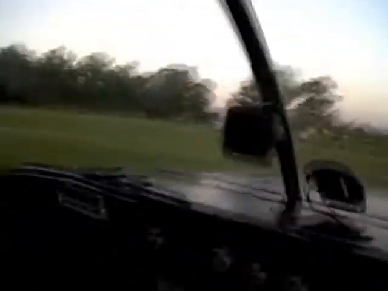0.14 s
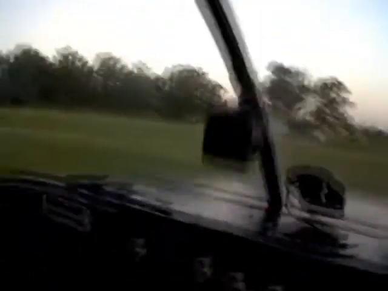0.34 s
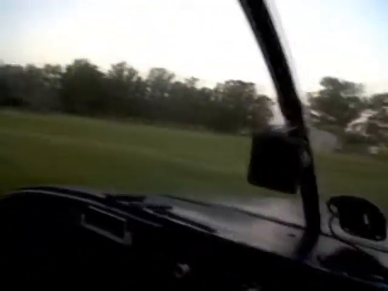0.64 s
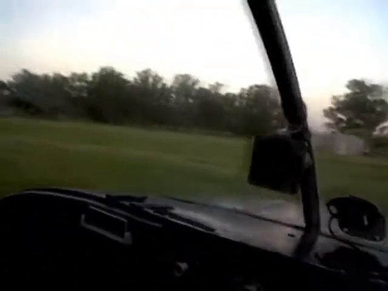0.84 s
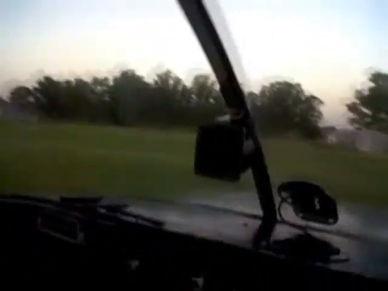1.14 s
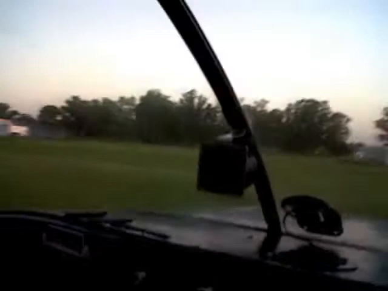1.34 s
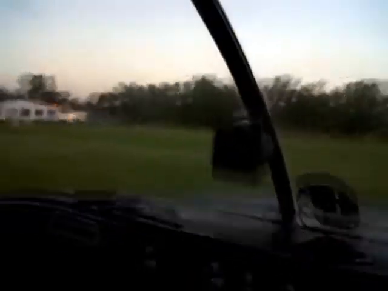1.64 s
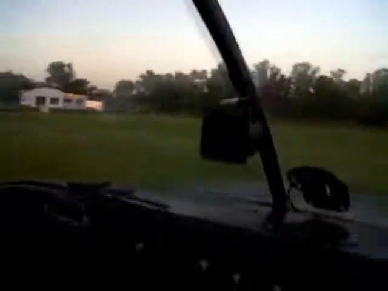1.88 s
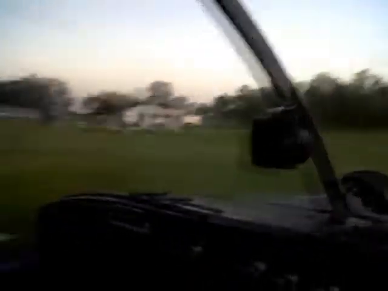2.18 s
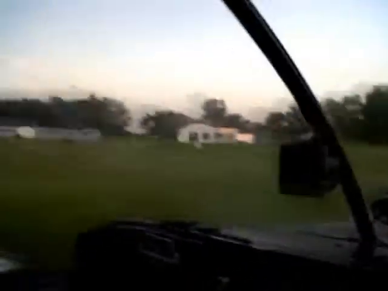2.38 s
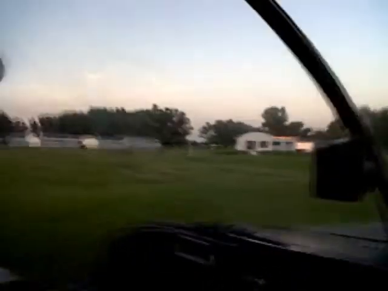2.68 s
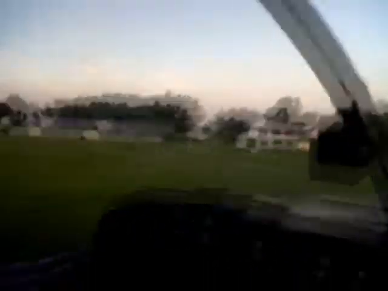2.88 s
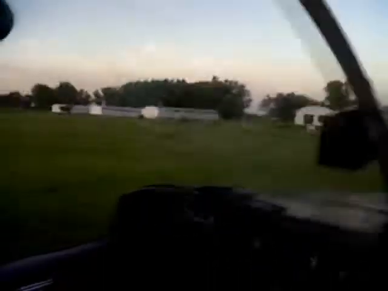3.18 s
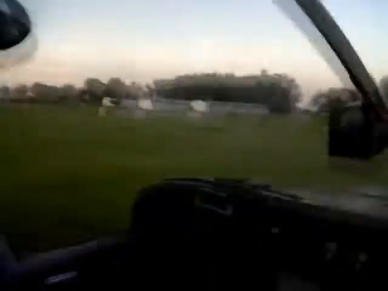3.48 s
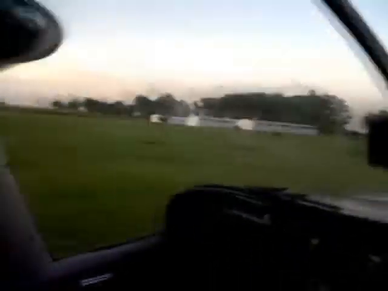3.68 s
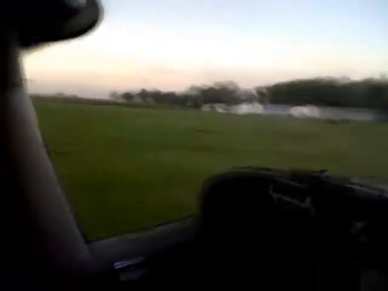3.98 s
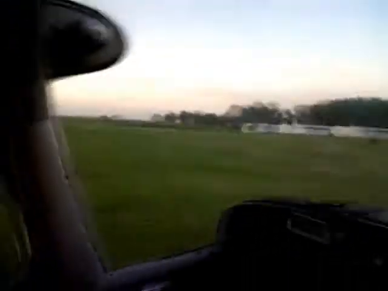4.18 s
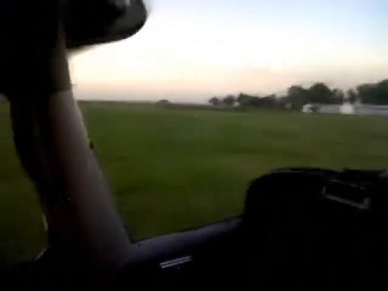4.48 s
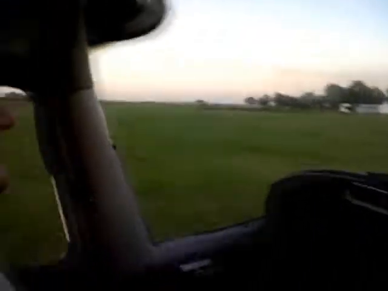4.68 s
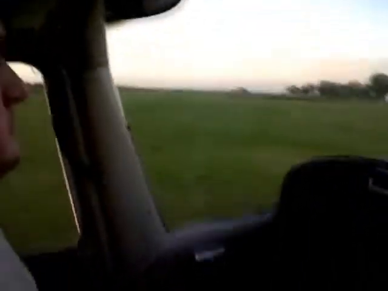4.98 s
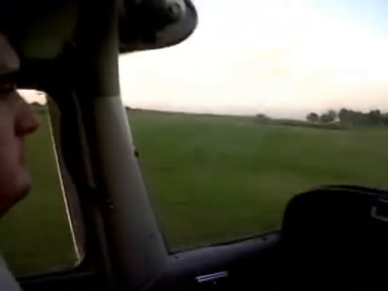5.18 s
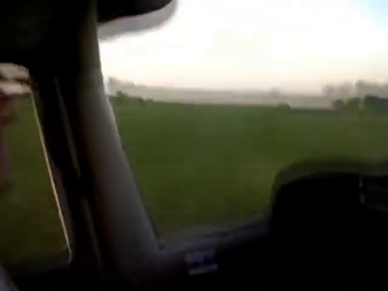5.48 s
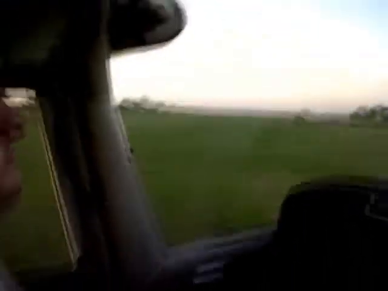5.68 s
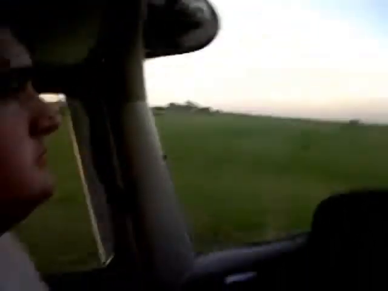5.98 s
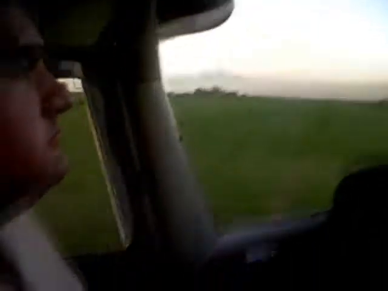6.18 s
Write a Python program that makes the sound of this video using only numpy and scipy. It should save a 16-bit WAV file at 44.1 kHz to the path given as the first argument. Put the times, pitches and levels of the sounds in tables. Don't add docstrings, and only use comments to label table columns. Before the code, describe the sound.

Muffled engine hum in a bumpy cabin, quiet at first, then dull jolts, hard plastic knocks, brief squeaks and metallic jingles in clusters.

```python
import sys
import numpy as np
from scipy import signal
from scipy.fft import rfft, irfft, next_fast_len
from scipy.io import wavfile
from scipy.ndimage import uniform_filter1d

SR = 44100
rng = np.random.default_rng(int(sys.argv[2]) if len(sys.argv) > 2 else 0)


def waveform_to_disk(signal):
    frames = np.transpose(np.atleast_2d(signal))
    scaled = np.clip(frames, -1, 1) * 32767
    samples = np.round(scaled).astype(np.int16)
    wavfile.write(sys.argv[1], SR, samples)


def undo_db(level):
    steps = np.asarray(level, float) / 20
    return 10 ** steps


N = 279153

# (time [s], rate [firings/s])
FIRING_RATE = [
    (0, 26.5),
    (.45, 28.0),
    (.85, 28.3),
    (1.15, 27.6),
    (1.5, 26.5),
    (1.9, 25.75),
    (2.3, 25.4),
    (2.75, 25.03),
    (6.33, 24.98),
]
# (multiple of firing rate [-], level [dB])
ENGINE_ORDERS = [(2, -21), (3, -13), (4, -1), (5, -13), (6, -4.5), (7, -12.5), (8, -7), (9, -10),
                 (10, -13.5)]
ORDER_LOAD_SHARE = {2: .2, 3: 1, 4: -.15}
# (frequency [Hz], density [dB/Hz])
RUMBLE_SPECTRUM = [(12, -54), (20, -27), (48, -22.5), (71, -17), (92, 0), (214, 4.5), (326, -15.5),
                   (420, -9.5), (550, -51), (920, -120)]
# (frequency [Hz], density [dB/Hz])
CABIN_SPECTRUM = [(150, -40.5), (250, -4), (329, -2.5), (721, -8), (810, 4.5), (980, -8.5), (1220, -0.5),
                  (2100, -20.5), (2730, -47), (4620, -120)]
# (frequency [Hz], density [dB/Hz])
RATTLE_SPECTRUM = [(1500, -23), (1900, 0), (2300, -7.5), (2800, -12.5), (3250, -15.5), (3550, -23),
                   (3850, -26), (4100, -28.5)]
# (frequency [Hz], width [Hz], level [dB])
PANEL_MODES = [(548, 80, -2.5), (685, 22, -4.5), (808.3, 28, 1), (891, 54, -0.5), (1037, 9.2, -7.5),
               (1197, 32, -2), (1226, 76, 0), (1334.5, 13, -6), (1455, 82, 1.5), (1584.6, 12, -4.5),
               (1774, 94, -4)]
# (time [s], peak [dB])
TICK_HITS = [(0.0707, -61), (0.377, -48), (1.0839, -62), (1.3448, -46), (1.6307, -59), (1.8063, -58),
             (1.8307, -56), (2.2228, -55), (2.3501, -52), (2.5132, -45), (2.7053, -42), (2.7921, -47),
             (2.8414, -47.5), (3.5818, -47), (3.6651, -45), (4.4094, -54), (4.4393, -41), (4.6154, -51),
             (4.6778, -54), (5.5897, -37), (5.676, -44), (6.1988, -55)]
TRIM_NOTES_HZ = (798, 890, 1227, 1427)
# (time [s], peak [dB], chatter T60 [s])
DOOR_TRIM_HITS = [(1.546, -16.5, .14), (1.668, -15.5, 0.099), (1.844, -15, 0.031), (2.455, -15.5, 0.13),
                  (2.8, -11.5, .08), (3.501, -19, 0.049), (3.667, -8.5, 0.11), (3.903, -4, .04),
                  (4.57, -18, .06), (4.678, -16.5, .1), (4.698, -8, .08), (4.853, -8.5, 0.09),
                  (5.567, -21, .08), (5.662, -11.5, 0.09), (5.847, -18, .09)]
# (time [s], peak [dB], chatter T60 [s])
LOW_TRIM_HITS = [
    (2.148, -21, .09),
    (2.379, -6, 0.06),
    (2.903, -17, 0.074),
    (4.025, -24, .1),
    (4.106, -6, 0.12),
    (4.213, -11.5, 0.092),
    (4.374, -23, .06),
    (5.814, -25, .08),
]
# (time [s], peak [dB], chatter T60 [s])
MID_TRIM_HITS = [(.12, -16.5, 0.038), (.219, -23, 0.073), (.292, -19, .09), (.437, -23, 0.043),
                 (1.496, -19.5, 0.17), (2.222, 0, 0.047), (2.298, -10, .06), (2.353, -7, 0.11),
                 (2.705, -5, .12), (2.715, -8, 0.093), (2.761, -15, .08), (2.856, -5, 0.071),
                 (3.286, -25, .08), (3.409, -17.5, 0.13), (3.97, -8, 0.086), (4.052, -8, 0.1),
                 (4.263, -4, 0.16), (4.292, -2, 0.058), (4.425, -10, 0.22), (6.039, -19, 0.047)]
# (time [s], peak [dB], chatter T60 [s])
HIGH_TRIM_HITS = [(1.748, -18.5, 0.12), (1.825, -15.5, 0.075), (1.982, -21, .09), (3.706, -14.5, 0.18),
                  (3.897, -7, 0.046), (4.159, -8.5, .08), (4.479, -8, 0.11), (4.619, -6.5, 0.16),
                  (4.756, -10, 0.15), (4.952, -10.5, .07), (5.091, -19, 0.14), (5.592, -6.5, 0.076),
                  (5.716, -11.5, 0.054), (5.735, -14, .07), (5.75, -13.5, 0.1), (6.259, -19, 0.062)]
# (time [s], peak [dB], frequency [Hz], length [s])
SQUEAK_HITS = [(0.244, -40, 2530, 0.021), (0.463, -46, 2600, 0.019), (1.587, -26.5, 2520, 0.013),
               (1.612, -40, 2600, 0.0067), (2.241, -32, 2650, 0.011), (2.713, -27.5, 2545, .022),
               (2.784, -22.5, 2524, 0.016), (2.837, -18, 2533, 0.012), (3.117, -44, 2570, 0.013),
               (3.19, -43.5, 2550, 0.02), (5.872, -40, 2780, 0.019), (5.978, -46.5, 2690, 0.015)]
# (time [s], peak [dB], frequency [Hz])
FIRING_THUMPS = [(.725, -25, 424), (.876, -18.5, 500), (1.082, -21.5, 527), (1.35, -21.5, 404), (1.425, -22.5, 423),
                 (1.807, -24, 400), (1.841, -21, 560), (2.22, -13.5, 566), (2.506, -18, 614), (2.745, -18, 462),
                 (2.861, -9, 523), (2.904, -10.5, 520), (2.945, -16, 607), (3.026, -17, 553), (3.069, -15.5, 526),
                 (3.147, -22, 480), (3.501, -20, 423), (3.665, -9.5, 590), (3.704, -15, 365), (3.742, -10, 507),
                 (3.902, -11, 600), (3.95, -12, 516), (3.988, -11, 565), (4.11, -6.5, 556), (4.19, -10, 580),
                 (4.274, -7, 570), (4.438, -11.5, 550), (4.787, -14, 550), (5.147, -20.5, 610), (6.259, -18.5, 492)]
# (time [s], peak [dB])
JINGLE_HITS = [(0.788, -49), (1.0819, -51), (1.3475, -56), (1.588, -49), (1.8425, -48), (2.2226, -42.5),
               (2.3511, -41), (2.7094, -42), (2.778, -44), (2.8392, -58), (3.026, -52), (3.198, -44.5),
               (3.6653, -52), (3.923, -40), (4.0834, -34), (4.4163, -34.5), (4.498, -38), (4.617, -43),
               (4.7658, -35), (5.5896, -38), (5.7174, -52), (5.7953, -50), (5.86, -45)]
# (time [s], swell [dB])
BODY_HEAVES = [(.22, 3), (1.12, 1.5), (1.35, 3), (1.51, 2), (1.64, 2.5), (1.81, -2), (2.07, 2.5),
               (2.42, 1.5), (2.73, 2), (3.24, 5), (3.71, 4), (4.09, 5.5), (4.5, 3), (5.23, 1), (5.3, 5.5),
               (5.76, 5.5), (5.84, 5.5), (6.19, 5.5)]
# (time [s], lift [dB])
RATTLE_SHAKES = [(1.12, 3.5), (1.35, 5.5), (1.6, 3), (1.81, 5), (1.98, 5.5), (2.26, 6.5), (2.77, 4.5),
                 (3.86, 4), (4.09, 4), (4.67, 6.5), (5.29, 6.5), (5.43, 3), (5.84, 3), (6.23, 4)]
# (time [s], depth [dB], half length [s])
SUPPRESSOR_CLAMPS = [(.15, 2, 0.087), (1.0, 2, 0.2), (1.41, 4.5, .1), (1.93, 3, 0.12), (2.6, 2, 0.062),
                     (3.57, 4.5, 0.11), (5.03, 0, 0.12), (5.5, 2, 0.086), (6.14, 3.5, 0.059),
                     (3.85, -1, .08), (4.35, 0, 0.073)]
SNAP_TIMES_S = [
    1.5,
    1.97,
    2.222,
    2.706,
    3.665,
    3.897,
    4.424,
    5.592,
]
# (opening [dB], hold [s], sag [dB/s], closing [s])
SNAP_OPENINGS = [
    (2, 0.18, 0, 0.037),
    (3.5, .05, 17, 0.061),
    (12, 0.18, 20, 0.13),
    (12.5, 0.36, 22.5, 0.03),
    (9.5, 0.23, 25, 0.21),
    (12.5, 0.5, 8.5, .12),
    (12.5, 0.46, 6.5, 0.11),
    (9.5, 0.26, 1.5, 0.2),
]
# (frequency [Hz], gain [dB])
IMAGE_LEAK = [(4000, -7), (4400, -8.5), (4800, -15.5), (5450, -26), (5900, -34), (6300, -41.5), (6700, -50),
              (7200, -61), (7600, -85), (8800, -82), (9200, -68), (9600, -69), (9900, -95.5)]

FIRES_AT_S = 3.665
HEAVE_HALF_S, SHAKE_HALF_S = 0.058, 0.062
TRIM_SPREAD = 0.018
SQUEAK_SAG = 0.05
JINGLE_HZ, JINGLE_T60_S, JINGLE_WIDTH_HZ = 3120, 0.18, 600
LEAD_S, LEAD_SHARE = 0.056, 0.4
PANEL_SHUT_DB, BOOM_SHUT_DB, TOP_SHUT_DB = -34, -39.5, -55
BOOM_FOLLOWS, TOP_FOLLOWS = 0.92, 0.95
BOOM_CLAMP, TOP_CLAMP = 1.3, 1.1
PHONE_RATE_HZ = 8000


def rms_one(x):
    return x / np.sqrt(np.mean(x ** 2) + 1e-20)


def in_time(rows):
    s, *columns = np.transpose(rows)
    return [np.interp(np.arange(N) / SR, s, c) for c in columns]


def coloured(x, spectrum):
    hz, level_db = np.transpose(spectrum)
    size = next_fast_len(N + SR // 4)
    grid_hz = np.maximum(np.fft.rfftfreq(size, 1 / SR), 1)
    below_oct = np.maximum(np.log2(hz[0] / grid_hz), 0)
    above_oct = np.maximum(np.log2(grid_hz / hz[-1]), 0)
    gain_db = np.interp(np.log(grid_hz), np.log(hz), level_db) - 37 * (below_oct + above_oct)
    return irfft(rfft(x, size) * undo_db(gain_db), size)[:N]


def steps(frame_s, spread_db):
    size = max(round(frame_s * SR), 8)
    level = np.repeat(rng.standard_normal(N // size + 1), size)[:N]
    return undo_db(spread_db * uniform_filter1d(level, size=size // 2))


def grit(share):
    return rng.standard_normal(N) * (rng.random(N) < share)


def resonate(x, hz, width_hz):
    r = np.exp(-np.pi * width_hz / SR)
    zeros = [(1 - r * r) / 2, 0, (r * r - 1) / 2]
    poles = [1, -2 * r * np.cos(2 * np.pi * hz / SR), r * r]
    return signal.lfilter(zeros, poles, x)


def burst(length, hz, rise_s, t60_s):
    t = np.arange(length) / SR
    fade = undo_db(-60 * np.maximum(t - rise_s, 0) / t60_s)
    return np.minimum(t / rise_s, 1) * fade * np.sin(2 * np.pi * hz * t)


def add(out, s, piece):
    at = round(s * SR)
    out[at:at + len(piece)] += piece[:N - at]


def humps(rows, half_s=None):
    t = np.arange(N) / SR
    total_db = np.zeros(N)
    for row in rows:
        place = np.clip((t - row[0]) / (half_s or row[2]), -1, 1)
        total_db += row[1] * np.cos(np.pi / 2 * place) ** 2
    return total_db


def engine(firing_hz, turns, boom_db):
    load_db = 4.5 * (firing_hz - 25)
    uneven = turns + 0.012 * np.log(steps(0.07, 8.7))
    tones = np.zeros(N)
    for order, db in ENGINE_ORDERS:
        gain = undo_db(db + load_db * ORDER_LOAD_SHARE.get(order, 0)) * steps(0.073, 1.2)
        tones += gain * np.sin(2 * np.pi * (order * uneven + rng.random()))
    rumble = coloured(rng.standard_normal(N), RUMBLE_SPECTRUM) * steps(0.033, 0.75)
    return undo_db(boom_db) * (undo_db(-1.0) * rms_one(tones) + undo_db(-3.0) * rms_one(rumble))


def panels(turns, panel_db):
    strong = undo_db(-4 * (np.floor(turns) % 2))
    push = 1 + 0.62 * strong * np.exp(-(turns % 1) / 0.55)
    air = coloured(grit(0.04) * push * steps(0.0077, 1.3), CABIN_SPECTRUM)
    buzz = np.zeros(N)
    for hz, width_hz, db in PANEL_MODES:
        mode = resonate(grit(0.03) * push, hz, width_hz) / np.sqrt(width_hz)
        buzz += undo_db(db) * steps(0.025, 3.54) * mode
    buzz = signal.sosfilt(signal.butter(4, 1900, fs=SR, output="sos"), buzz)
    fires = np.diff(np.floor(turns), prepend=turns[0]) > 0.5
    thud = resonate(resonate(fires * strong * steps(0.04, 4.1), 410, 360), 558, 300)
    mix = undo_db(-4.5) * rms_one(air) + undo_db(-1.5) * rms_one(buzz) + undo_db(-13.5) * rms_one(thud)
    return undo_db(panel_db) * mix


def fine_rattle(top_db):
    lumps = steps(0.005, 1.5) * steps(0.02, 2.2)
    return undo_db(top_db) * rms_one(coloured(grit(0.13) * lumps, RATTLE_SPECTRUM))


def ticks():
    out = np.zeros(N)
    for s, db in TICK_HITS:
        add(out, s, undo_db(db + 1.5) * burst(230, 3800, 0.00018, 0.003))
    return out


def knock(hz, t60_s):
    t = np.arange(4000) / SR
    ring = burst(4000, hz, 0.0017, 0.023)
    fade = np.minimum(t / 0.0044, 1) * undo_db(-60 * t / t60_s)
    rattle = rms_one(resonate(resonate(rng.standard_normal(4000), hz, 190), hz, 190))
    crack = resonate(rng.standard_normal(4000), 2900, 1100) * undo_db(-60 * t / 0.0067)
    return 0.81 * ring + 0.61 * fade * rattle + undo_db(-28.0) * crack


def trim_knocks():
    out = np.zeros(N)
    pieces = (DOOR_TRIM_HITS, LOW_TRIM_HITS, MID_TRIM_HITS, HIGH_TRIM_HITS)
    for hits, note_hz in zip(pieces, TRIM_NOTES_HZ):
        for s, db, t60_s in hits:
            hz = note_hz * (1 + TRIM_SPREAD * rng.uniform(-0.58, 1))
            add(out, s, undo_db(db - 5) * knock(hz, max(t60_s, 0.02)))
    return out


def squeak(hz, length_s):
    t = np.arange(round(2.5 * length_s * SR)) / SR
    rise = t / length_s * 2
    swell = (rise * np.exp(1 - rise)) ** 2 * np.hanning(2 * len(t))[len(t):] ** 0.5
    band = signal.butter(3, [hz - 250, hz + 400], "band", fs=SR, output="sos")
    chatter = rms_one(signal.sosfilt(band, rng.standard_normal(4000)))[-len(t):]
    sag = 1 + SQUEAK_SAG / 2 - SQUEAK_SAG / 2 * t / length_s
    glide = np.sin(2 * np.pi * hz * t * sag)
    return swell * 0.7 * glide + swell ** 0.6 * 0.33 * chatter


def squeaks():
    out = np.zeros(N)
    for s, db, hz, length_s in SQUEAK_HITS:
        add(out, s, undo_db(db) * squeak(hz, length_s))
    return out


def firing_thumps():
    out = np.zeros(N)
    for s, db, hz in FIRING_THUMPS:
        add(out, s, undo_db(db - 2.5) * burst(1500, hz, 0.0008, 0.027))
    return out


def jingle():
    t = np.arange(4000) / SR
    chatter = resonate(rng.standard_normal(4000), JINGLE_HZ, JINGLE_WIDTH_HZ)
    chatter = resonate(chatter, JINGLE_HZ, JINGLE_WIDTH_HZ)
    return 0.78 * np.minimum(t / 0.012, 1) * undo_db(-60 * t / JINGLE_T60_S) * rms_one(chatter)


def jingles():
    out = np.zeros(N)
    for s, db in JINGLE_HITS:
        add(out, s, undo_db(db - 4.5) * jingle())
    return out


def suppressor():
    out, t = np.zeros(N), np.arange(N) / SR
    for s, (db, hold_s, sag_db_s, close_s) in zip(SNAP_TIMES_S, SNAP_OPENINGS):
        end_db = max(db - sag_db_s * hold_s, 0)
        corners_s = [-LEAD_S, -0.002, 0, hold_s, hold_s + close_s]
        opening_db = np.interp(t - s, corners_s, [0, LEAD_SHARE * db, db, end_db, 0])
        out = np.maximum(out, opening_db)
    return out


def scene():
    firing_hz = in_time(FIRING_RATE)[0]
    turns = np.cumsum(firing_hz) / SR
    turns = turns - turns[round(FIRES_AT_S * SR)]
    open_db, clamp_db = suppressor(), humps(SUPPRESSOR_CLAMPS)
    panel_db = PANEL_SHUT_DB + open_db - clamp_db
    boom_db = BOOM_SHUT_DB + BOOM_FOLLOWS * open_db - BOOM_CLAMP * clamp_db
    boom_db = boom_db + humps(BODY_HEAVES, HEAVE_HALF_S)
    top_db = TOP_SHUT_DB + TOP_FOLLOWS * open_db - TOP_CLAMP * clamp_db
    top_db = top_db + humps(RATTLE_SHAKES, SHAKE_HALF_S)
    drone = engine(firing_hz, turns, boom_db) + panels(turns, panel_db) + fine_rattle(top_db)
    bumps = ticks() + trim_knocks() + squeaks() + firing_thumps() + jingles()
    return (drone + bumps)[None]


def top_cut(x):
    return signal.sosfilt(signal.butter(12, 9900, fs=SR, output="sos"), x)


def record(dry):
    band = signal.sosfilt(signal.butter(6, 3900, fs=SR, output="sos"), dry[0])
    band = signal.sosfilt(signal.butter(2, 30, "high", fs=SR, output="sos"), band)
    carrier = np.cos(2 * np.pi * PHONE_RATE_HZ * np.arange(N) / SR)
    images = coloured(2 * band * carrier, IMAGE_LEAK)
    noise = undo_db(-94.5) * rng.standard_normal(N)
    return top_cut((band + images + noise)[None])


dry = scene()
out = record(dry)
waveform_to_disk(out)
```